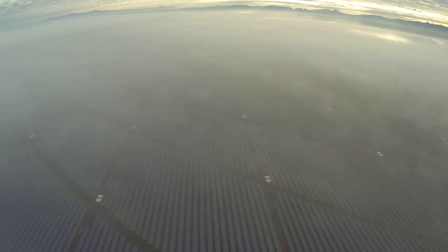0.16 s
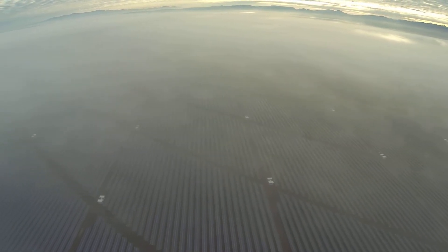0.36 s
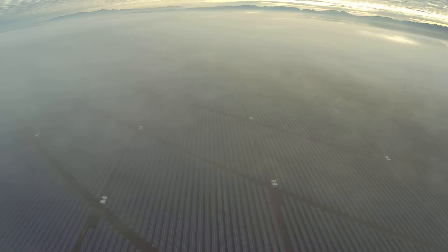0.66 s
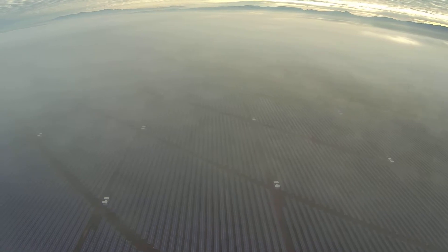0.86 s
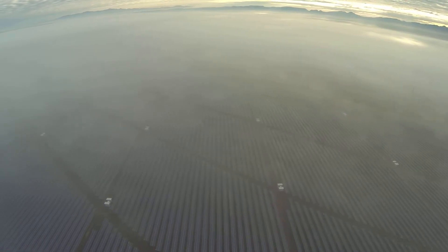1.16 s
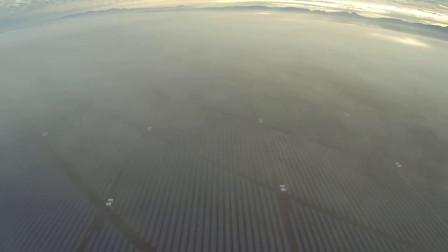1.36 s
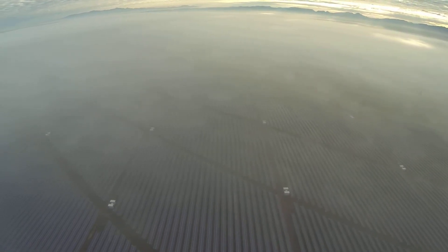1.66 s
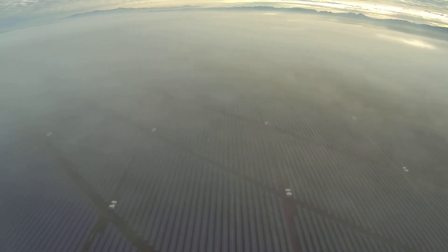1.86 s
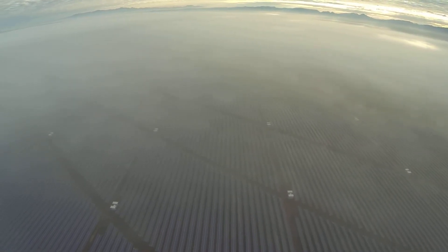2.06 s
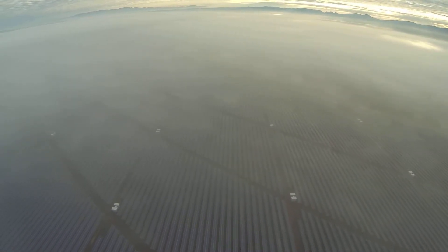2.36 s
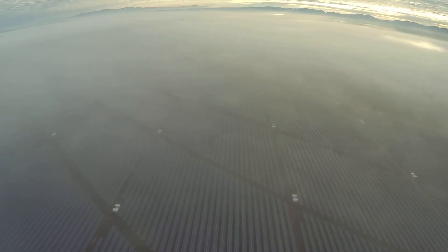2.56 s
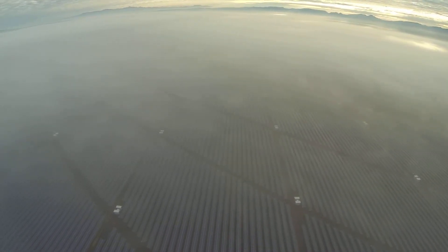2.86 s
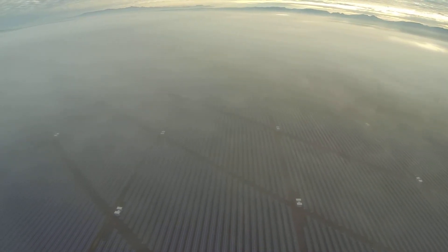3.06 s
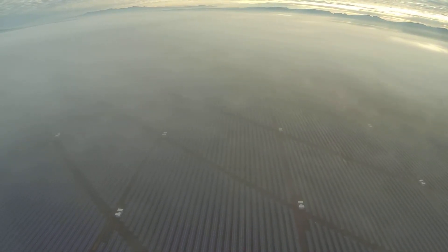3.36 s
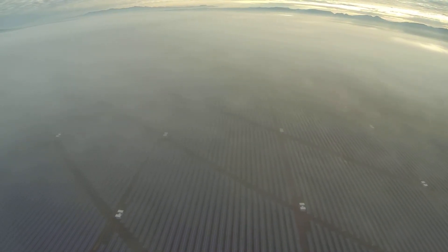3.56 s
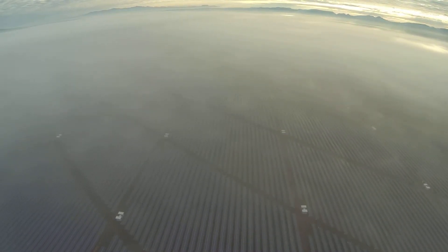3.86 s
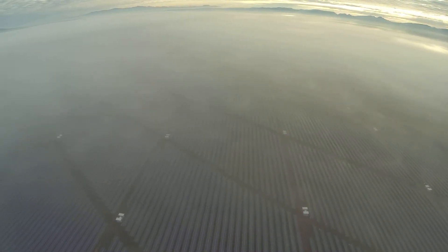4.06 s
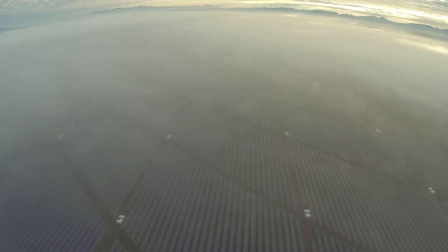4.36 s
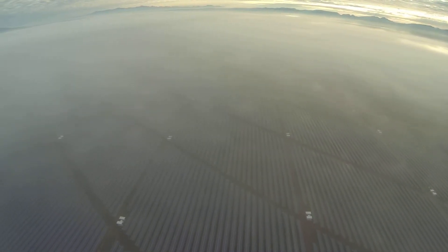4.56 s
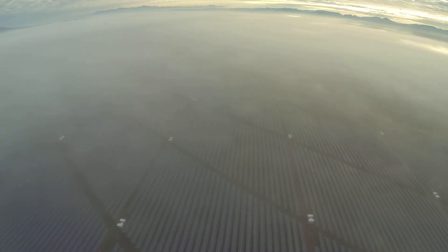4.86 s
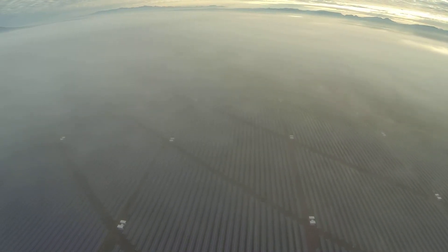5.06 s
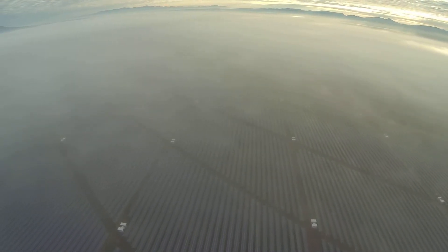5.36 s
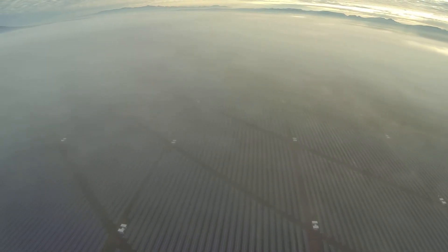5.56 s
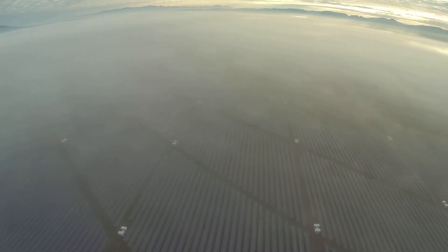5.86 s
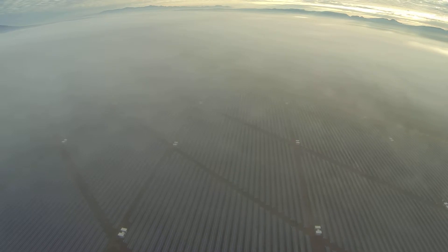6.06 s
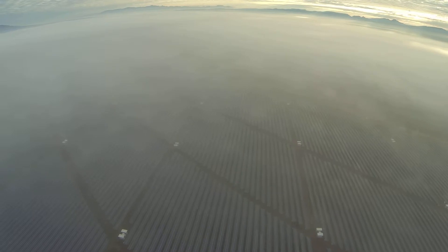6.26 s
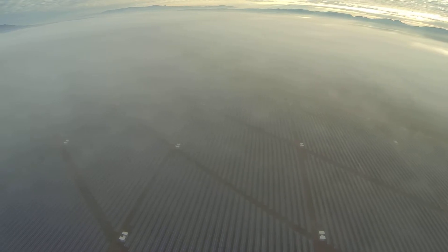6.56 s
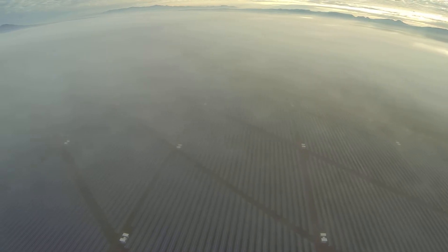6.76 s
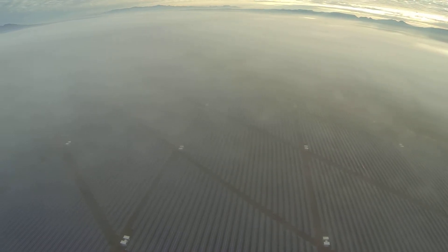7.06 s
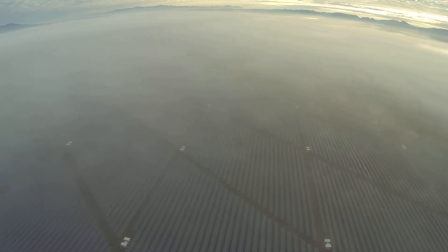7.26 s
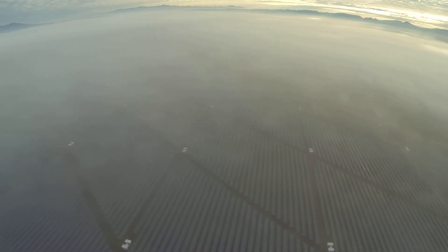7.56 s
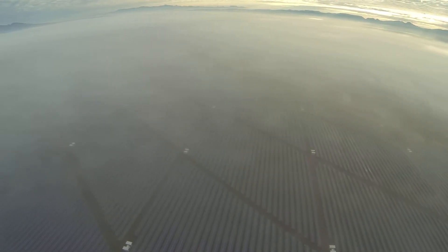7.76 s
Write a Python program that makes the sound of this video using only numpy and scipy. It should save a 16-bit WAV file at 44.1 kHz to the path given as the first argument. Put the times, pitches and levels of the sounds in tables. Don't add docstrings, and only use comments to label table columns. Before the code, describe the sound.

A small multirotor drone hums low and steady in flight, first with hard rotor-wash pops battering the microphone, then smooth hum, airy hiss and wind rumble.

```python
import sys
import numpy as np
from scipy import signal
from scipy.io import wavfile
from scipy.ndimage import uniform_filter1d

SR = 44100
rng = np.random.default_rng(int(sys.argv[2]) if len(sys.argv) > 2 else 0)


def log_audio(samples):
    frames = np.atleast_2d(samples).T
    limited = np.clip(frames, -1, 1)
    pcm = np.round(limited * 32767).astype(np.int16)
    wavfile.write(sys.argv[1], SR, pcm)


def to_linear_factor(level_db):
    exponent = np.asarray(level_db, float) / 20
    return 10 ** exponent


N = 348831

# t/s, f/Hz
NEAR_SHAFT_RATE = [(0.0, 104.89), (0.4, 105.49), (0.79, 106.07), (1.18, 106.07), (1.58, 105.82),
                   (1.98, 106.49), (2.37, 106.24), (3.16, 106.66), (3.95, 106.21), (4.74, 107.08),
                   (5.14, 106.98), (5.93, 105.73), (6.32, 106.07), (7.11, 105.56), (7.51, 105.82),
                   (7.9, 105.39)]
# t/s, second f/Hz, third f/Hz, fourth f/Hz
FAR_SHAFT_RATES = [(0.0, 127.2, 135.34, 111.4), (1.0, 127.2, 136.8, 111.4), (2.8, 127.2, 137.4, 111.4),
                   (4.35, 126.95, 136.8, 111.5), (5.5, 127.15, 136.9, 111.7), (5.93, 127.6, 137.35, 112.2),
                   (6.4, 127.25, 137.2, 111.8), (7.5, 128.2, 137.9, 112.6), (7.9, 127.5, 137.7, 112.2)]
# t/s, usual slap level/dB, sharpness/dB
WAKE_DEPTH = [(0, -27, -2), (.2, -35.5, -10), (.43, -23.5, 10), (.58, -34.5, -2), (.78, -27.5, 7),
              (1.1, -32.5, -10), (1.35, -26, 4), (1.56, -34.5, 8), (1.75, -34.5, 2), (1.98, -28, 18),
              (2.15, -34, -7), (2.28, -32, 7), (2.4, -39.5, 5), (2.9, -46, 11), (3.3, -51, 2),
              (3.6, -44, 8), (3.9, -60, 0)]
# t/s, thump level/dB, flutter level/dB, crackle level/dB
HARD_SLAPS = [(0.0681, 4, -10, -32.5), (0.124, -4, -14, -44), (0.2104, 1, -15, -24), (0.32, 6, -21, -32),
              (0.3716, -5, -6, -30), (0.4284, 8, -5.5, -29), (0.4956, 0, -11, -29), (0.5906, 5, -16, -36),
              (0.637, -16, -15.5, -9), (0.6934, -5, -9, -28), (0.8066, 1, 0.5, -11), (0.8643, -2, -21, -30),
              (0.9292, -2.5, -8, -18), (1.0048, -1.5, -19, -33), (1.0609, 7, -21, -25),
              (1.118, 18, -6, -32), (1.2033, -7, -15, -35), (1.269, -3.5, -6, -31), (1.3342, -1, 0.5, -30),
              (1.3911, -5, -8.5, -26), (1.5047, -15, -18, -30), (1.6173, 2, -14, -37),
              (1.703, -1.5, -7.5, -31), (1.7787, 5, -5.5, -25), (1.854, 9, -11, -20), (1.9431, 4, -6, -24),
              (2.013, -18, -4, -21), (2.1173, -4.5, -11.5, -28), (2.1543, -0.5, -26, -40),
              (2.2201, -4, -5.5, -30)]
# t/s, thump level/dB, flutter level/dB, crackle level/dB
GRAZING_SLAPS = [(2.2668, -4.5, -2.5, -31), (2.3516, -3, -11, -28), (2.475, -6, -23, -9.5),
                 (2.5026, -15.5, -9, -10.5), (2.5395, 3, -14, -8), (2.6062, -4, -12, -29),
                 (2.7, 1, -7, -28), (2.729, -8, -13, -34), (2.748, 3, -21, -33), (2.766, -8.5, -13, -36),
                 (2.7943, -4, -11.5, -37), (2.8414, -6.5, -6, -34), (2.8595, -5.5, -13, -37),
                 (2.8787, -4.5, -12.5, -38), (2.9251, -8, -18, -22), (2.9347, -10.5, -16.5, -41),
                 (3.02, -7.5, -22, -17), (3.0381, -22, -24, -11.5), (3.0561, -19, -27, -22),
                 (3.1037, -27, -14, -7), (3.123, -8, -34, -11), (3.1699, -7.5, -32, -14),
                 (3.1883, -7, -18, -7), (3.2168, -12, -19, -22), (3.2537, -13, -25, -40),
                 (3.386, -14.5, -20, -40), (3.4139, -8, -16, -40), (3.48, -12.5, -19, -14.5),
                 (3.678, -9, -11, -27), (3.8229, -17.5, -23, -39)]
# "near second third fourth" orders, level/dB under the blade tone
BLADE_TONES = [
    ("2 0 0 0", 0.055),
    ("0 2 0 0", -18),
    ("0 0 2 0", -34),
    ("0 0 0 2", -26),
    ("-2 2 0 0", -17),
    ("-2 0 2 0", -11.5),
    ("0 0 2 -2", -18.5),
]
# "near second third fourth" orders, level/dB over the air noise
MOTOR_WHINES = [
    ("0 84 0 0", -18),
    ("84 0 0 0", -9),
    ("0 42 0 0", -2.5),
    ("0 0 42 0", -9),
    ("0 0 0 42", -1.5),
    ("0 0 20 0", -4),
]
# "near second third fourth" orders, level/dB under near shaft
FRAME_SHAKE = [
    ("1 0 0 0", 0),
    ("0 1 0 0", -8),
    ("0 0 1 0", -7),
    ("0 0 0 1", -11),
    ("2 0 -1 0", -10),
    ("2 -1 0 0", -9),
    ("2 0 0 -1", -13),
    ("4 0 -2 0", -5),
    ("4 -2 0 0", -7),
]
# f/Hz, level/dB per Hz
RUMBLE_SPECTRUM = [(25, -30), (45, 5), (70, 2), (130, -2), (180, -6), (260, -5), (400, -12)]
# f/Hz, level/dB per Hz
HISS_SPECTRUM = [(150, -21), (300, 2), (700, 3.5), (1100, -0.5), (2000, -12), (3000, -16.5), (4300, -44),
                 (7000, -42)]
# f/Hz, level/dB per Hz
AIR_SPECTRUM = [(1500, 14), (3000, 6), (5000, 1.5), (8000, -3.5), (12500, -3), (15000, -2), (17000, -18)]
# t/s, opening level/dB, headwind level/dB
FLIGHT_COURSE = [(0, 2, -1), (.3, -0.5, -5.5), (1.3, 1, -4), (2.1, 2, -5), (2.45, 1, -2.5), (3, 3.5, -2.5),
                 (3.7, 5, -1.5), (4.27, 6.5, 3), (4.8, 6, 2.5), (5.6, 7.5, 7.5), (6.0, 7, 10),
                 (6.6, 7, 9.5), (7, 6.5, 6.5), (7.5, 7.5, 9), (7.91, 7, 6.5)]


def unit(x):
    return x / np.sqrt(np.mean(x ** 2) + 1e-20)


def in_time(rows):
    s, *columns = np.transpose(rows)
    return [np.interp(np.arange(N) / SR, s, c) for c in columns]


def drift(hz):
    pole = np.exp(-32 * np.pi * hz / SR)
    white = rng.standard_normal(N // 16 + 3002)
    slow = signal.lfilter([1], [1, -2 * pole, pole * pole], white)[3000:]
    return np.interp(np.arange(N) / 16, np.arange(len(slow)), unit(slow))


def shafts():
    turns = np.cumsum(in_time(NEAR_SHAFT_RATE) + in_time(FAR_SHAFT_RATES), axis=1) / SR
    at = (np.array(HARD_SLAPS + GRAZING_SLAPS)[:, 0] * SR).astype(int)
    angle = 2 * np.pi * (2 * turns[0, at] - .5)
    cos, sin = uniform_filter1d([np.cos(angle), np.sin(angle)], size=3, mode="nearest")
    error_turns = np.unwrap(np.arctan2(sin, cos)) / (4 * np.pi)
    turns[0] -= np.interp(np.arange(N), at, error_turns)
    turns[0] += .5 * (np.mean(np.sin(2 * np.pi * turns[0, at])) < 0)
    return turns


def wind_noise(spectrum, shared_db, own_db, own_hz):
    hz, db = np.transpose(spectrum)
    edges = hz[0] * np.sqrt(2) ** np.arange(int(2 * np.log2(hz[-1] / hz[0])) + 2)
    white, out = rng.standard_normal((2, N)), 0
    for k, (low, high) in enumerate(zip(edges, np.minimum(edges[1:], SR / 2.2))):
        sos = signal.butter(2, [low, high], "band", fs=SR, output="sos")
        band = signal.sosfilt(sos, white[k % 2])
        level_db = np.interp(np.log(low * high) / 2, np.log(hz), db)
        out = out + to_linear_factor(level_db + shared_db + own_db * drift(own_hz)) * band
    return unit(out)


def tones(table, turns, wobble_db, jitter):
    out = 0
    for k, (orders, db) in enumerate(table):
        phase = np.array(orders.split(), float) @ turns + jitter * drift(8.0) * (k > 0)
        level_db = db + wobble_db * drift(2.5) * (0.23 + (k > 0))
        out = out + to_linear_factor(level_db) * np.sqrt(2) * np.cos(2 * np.pi * phase)
    return out


def wind_rumble(opening_db):
    rumble_db = -20 + 0.1 * opening_db
    return to_linear_factor(rumble_db - 2.5) * wind_noise(RUMBLE_SPECTRUM, 0, own_db=0.5, own_hz=2.4)


def air_and_whines(turns, opening_db, swell_db):
    air_db = -61.5 + 1.65 * opening_db
    air = wind_noise(AIR_SPECTRUM, 0.062 * swell_db, own_db=0.7, own_hz=24.9)
    whines = tones(MOTOR_WHINES, turns, wobble_db=2.0, jitter=0.37)
    return to_linear_factor(air_db + 8.0) * air + to_linear_factor(air_db - 3.4) * whines


def hiss_swell(turns):
    sweep_db = 3.3 * np.cos(4 * np.pi * (turns[0] - .17))
    sweep_db += 0.15 * np.cos(2 * np.pi * (turns[0] - .65))
    gust_db = 2.94 * drift(160)
    return sweep_db + gust_db


def rotor_hiss(headwind_db, swell_db):
    hiss_db = -40.5 + headwind_db
    return to_linear_factor(hiss_db + 6.0) * wind_noise(HISS_SPECTRUM, swell_db, own_db=1.5, own_hz=25.4)


def frame_shake(turns):
    from_s, rise_s = 2.33, 0.77
    masked_db, full_db = -39.5, -21.5
    shake_db, = in_time([(from_s, masked_db), (from_s + rise_s, full_db)])
    return to_linear_factor(shake_db - 2.6) * tones(FRAME_SHAKE, turns, wobble_db=2.0, jitter=0.048)


def eddies(burst, hz, width_hz):
    sos = signal.butter(1, [hz - width_hz / 2, hz + width_hz / 2], "band", fs=SR, output="sos")
    noise = rng.standard_normal((len(burst), 500))
    rows = signal.sosfilt(sos, noise)[:, 100:] * burst
    return rows / np.linalg.norm(rows, axis=1, keepdims=True)


def slap(at, thump_db, flutter_db, crackle_db, draw):
    t = np.arange(-150, 250) / SR
    narrowing_db = -.35 * (flutter_db - thump_db + 11.0)
    width = 0.00017 * to_linear_factor(np.clip(narrowing_db, -4.0, 5.0))[:, None]
    spike = -np.exp(-(np.abs(t) / np.where(t < 0, 3.58 * width, width)) ** 1.5)
    rebound = 0.29 * np.exp(-((t - .0015) / 0.00093) ** 2)
    graze = np.maximum((at / SR - 2.45) / 0.18, np.abs(draw[:, 0]) - 0.45)
    graze = 0.83 * np.clip(graze, 0, 1)[:, None]
    spike += graze * np.exp(-((t - 1.82 * width * np.sign(draw[:, :1])) / (1.28 * width)) ** 2)
    length = 0.0003 * to_linear_factor(2.1 * draw[:, 2:3])
    burst = np.exp(-(t - .0001 * draw[:, 1:2]) ** 2 / length ** 2)
    burst = burst + 0.38 * (t > 0) * np.exp(-t / 0.0023)
    large = eddies(burst, hz=1500, width_hz=1300)
    small = eddies(burst ** 2, hz=3200, width_hz=2600)
    shapes = to_linear_factor(np.minimum(thump_db + 5.5, 4.5))[:, None] * (spike + rebound)
    shapes += to_linear_factor(flutter_db + 11.5)[:, None] * large
    shapes += to_linear_factor(crackle_db + 9.0)[:, None] * small
    out = np.zeros(N + 400)
    np.add.at(out, at[:, None] + np.arange(400), shapes)
    return out[150:N + 150]


def wake_slaps(turns):
    s, *levels_db = np.transpose(HARD_SLAPS + GRAZING_SLAPS)
    listed = (s * SR).astype(int)
    strong = slap(listed, *levels_db, rng.standard_normal((len(s), 3)))
    passage = np.floor(2 * turns[0, :int(WAKE_DEPTH[-1][0] * SR)] - .5)
    at = np.flatnonzero(np.diff(passage) > 0)
    draw = rng.standard_normal((len(at), 7))
    weaker_db = np.where(passage[at + 1] % 2 == 1, -13, 0)
    beat_db = 5.8 * np.cos(4 * np.pi * (turns[2, at] - turns[0, at] - .01))
    depth_db, sharp_db = np.array(in_time(WAKE_DEPTH))[:, at]
    usual_db = depth_db + weaker_db + beat_db
    free = np.min(np.abs(at[:, None] - listed), axis=1) > SR / 400
    luck_db = -7 * np.abs(draw[:, 3]) ** 1.5
    thump_db = np.minimum(usual_db + 22.5 + luck_db, -4.5)
    uneven_db = 3.5 * draw[:, 4] + .7 * luck_db
    flutter_db = np.minimum(usual_db + 14.5 + uneven_db, -10.5)
    crackle_db = np.minimum(flutter_db - 13.5 + sharp_db + 6.8 * draw[:, 6], -19)
    late = np.clip(at + 0.00037 * SR * draw[:, 5], 0, N - 1).astype(int)
    weak = slap(late[free], thump_db[free], flutter_db[free], crackle_db[free], draw[free])
    return signal.sosfilt(signal.butter(2, 4500, fs=SR, output="sos"), strong + weak)


def rotor_hum(turns, opening_db, headwind_db):
    blade_db = -19 + 1.225 * opening_db
    third_db = -22 - 1.15 * headwind_db
    hum = to_linear_factor(blade_db - 1.5) * tones(BLADE_TONES, turns, wobble_db=-1.0, jitter=0.055)
    third_order = np.sqrt(2) * np.sin(6 * np.pi * (turns[0] + 0.012))
    hum += to_linear_factor(third_db - 12.0) * third_order
    fourth_order = np.sqrt(2) * np.cos(8 * np.pi * turns[0])
    hum -= to_linear_factor(blade_db - 27.5) * fourth_order
    return hum


def scene():
    turns = shafts()
    opening_db, headwind_db = in_time(FLIGHT_COURSE)
    swell_db = hiss_swell(turns)
    mix = wind_rumble(opening_db)
    mix = mix + air_and_whines(turns, opening_db, swell_db)
    mix = mix + rotor_hiss(headwind_db, swell_db)
    mix = mix + frame_shake(turns)
    mix = mix + wake_slaps(turns)
    mix = mix + rotor_hum(turns, opening_db, headwind_db)
    return mix[None]


def band_limit(x):
    return signal.sosfilt(signal.butter(12, 15990, fs=SR, output="sos"), x)


def record(dry):
    x = signal.sosfilt(signal.butter(1, 60, "high", fs=SR, output="sos"), dry)
    ramp_db = 180 * np.arange(N) / SR
    over_db = np.clip(20 * np.log10(np.abs(x[0]) + 1e-9) + 3.34, 0, 6.0)
    held_db = np.maximum.accumulate(over_db + ramp_db) - ramp_db
    pole = np.exp(-1 / (0.0003 * SR))
    duck_db = -1.2 * signal.lfilter([1 - pole], [1, -pole], held_db)
    x = x * to_linear_factor(duck_db)
    x = x / (1 + np.abs(x) ** 14) ** (1 / 14)
    mix = signal.sosfilt(signal.cheby2(10, 50, 15850, fs=SR, output="sos"), x)
    return band_limit(mix)


dry = scene()
out = record(dry)
log_audio(out)
```